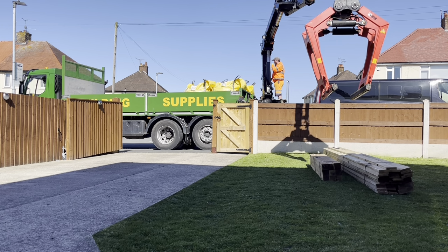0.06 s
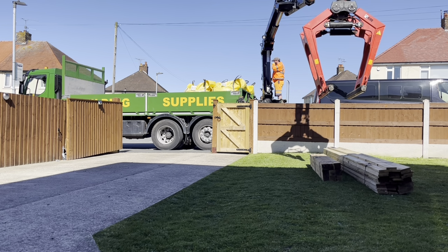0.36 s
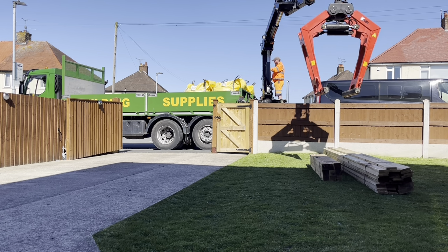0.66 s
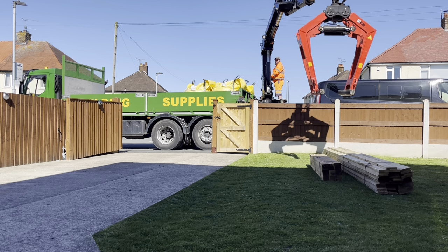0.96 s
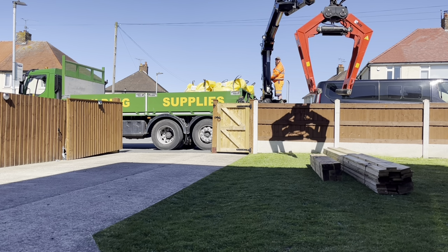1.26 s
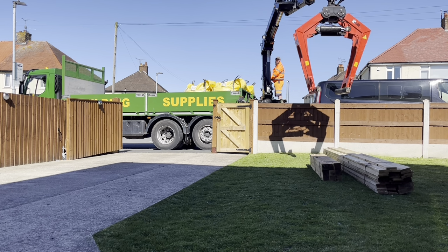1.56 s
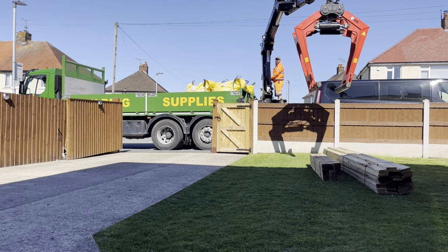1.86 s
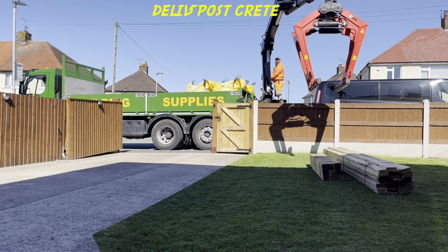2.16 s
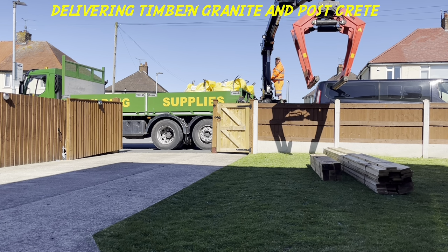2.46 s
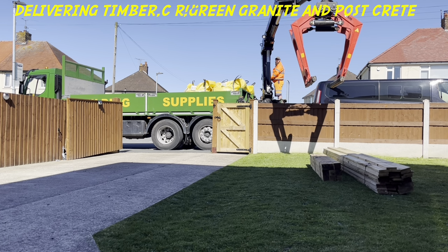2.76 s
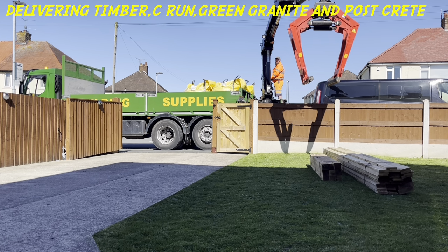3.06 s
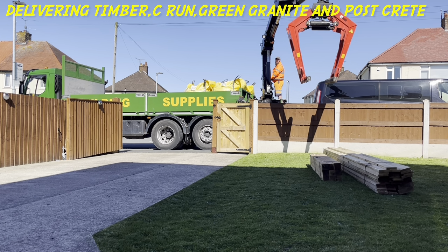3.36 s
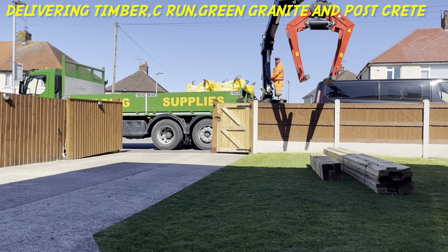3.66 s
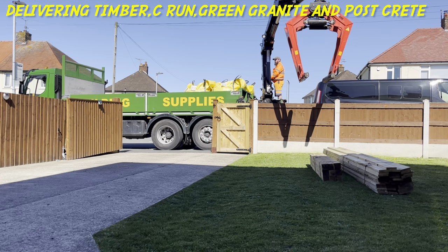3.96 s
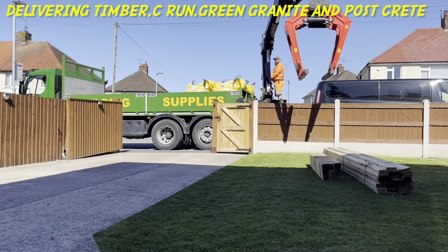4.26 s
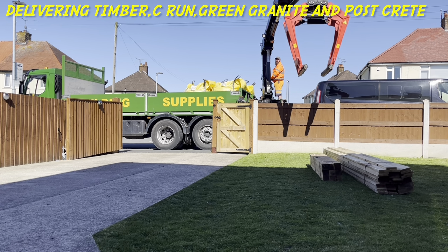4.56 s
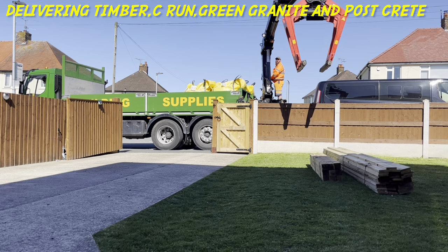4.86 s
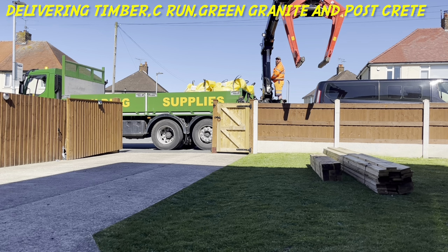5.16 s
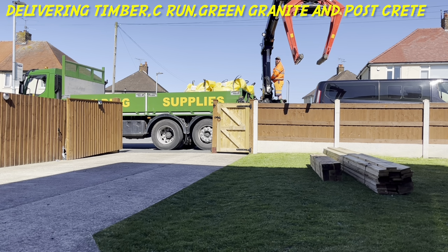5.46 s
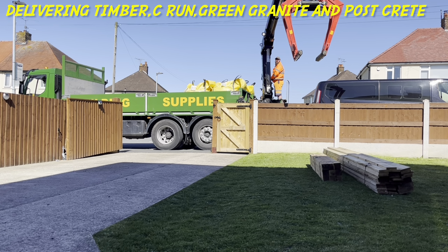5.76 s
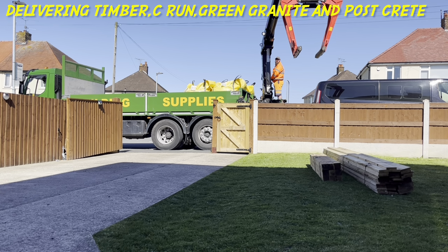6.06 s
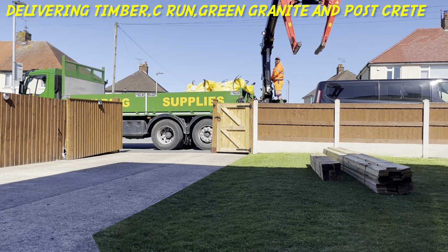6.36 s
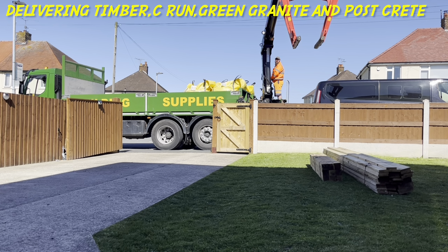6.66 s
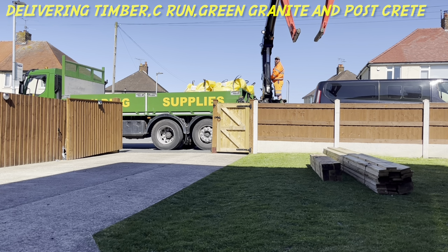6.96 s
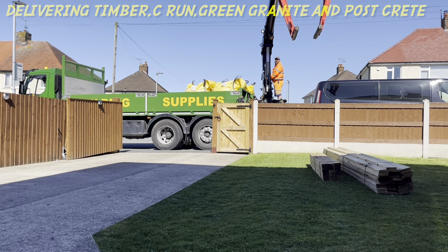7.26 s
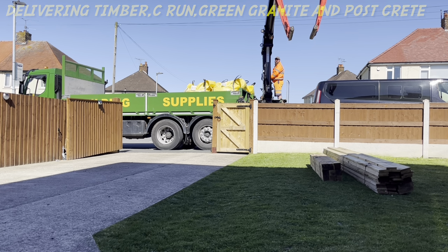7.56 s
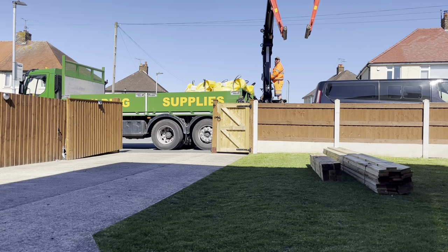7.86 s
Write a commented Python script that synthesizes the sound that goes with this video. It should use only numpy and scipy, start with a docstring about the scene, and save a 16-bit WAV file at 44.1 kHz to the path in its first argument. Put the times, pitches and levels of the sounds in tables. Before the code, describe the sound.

A diesel lorry idles throughout with a low, pulsing drone and a light rattle, while the pump of its loader crane hums and whines. About halfway, the steel grab gives a sharp clank, hydraulic hiss swells and the engine eases a little. A lighter knock follows a couple of seconds later, then a few faint clinks. It is heard outdoors in a street, with the lorry slightly to the left.

```python
"""A diesel lorry drones under load beyond a garden fence, driving the pump of its loader crane.
The engine pulses and rattles under thin gear whines; the pump's pressure ripple hums and whines,
and oil hisses through the valves with each lever stroke. The engine eases once the steel grab is open,
and the grab knocks twice as it is lifted clear. Fences and house fronts scatter the sound."""
import sys
import numpy as np
from scipy import signal
from scipy.fft import rfft, irfft, next_fast_len
from scipy.io import wavfile
from scipy.ndimage import uniform_filter1d, map_coordinates

SR = 44100
rng = np.random.default_rng(int(sys.argv[2]) if len(sys.argv) > 2 else 0)


def unload_audio(sound):
    """Save the sound as a 16-bit wav file, at the path given as the first command line argument."""
    columns = np.transpose(np.atleast_2d(sound))
    # keep every value between -1 and 1, then stretch to whole-number steps
    steps = np.round(np.clip(columns, -1, 1) * 32767)
    wavfile.write(sys.argv[1], SR, steps.astype(np.int16))


N = 353241
TIME = np.arange(N) / SR
RING_SAMPLES = 3 * SR // 4
IDLE_PISTON_HZ, PISTONS_PER_PULSE, PISTONS_PER_TURN = 86.19, 2.4, 6


def engine(piston_hz, above_idle_hz, work):
    """The diesel, geared to the pump; work runs from 1 (labouring) to 0 (relieved)."""
    pulse_hz = piston_hz / PISTONS_PER_PULSE   # about 36 Hz, two and a half beats per crank turn
    pulses = np.cumsum(pulse_hz) / SR
    body = drone(pulse_hz, above_idle_hz, work) + roar(above_idle_hz, work)
    beat = chug(piston_hz / PISTONS_PER_TURN, work) + clatter(pulses, work) + diesel_knock(pulses)
    return body + beat + fan(pulse_hz) + gears(pulse_hz, work)


# The engine's tones. Each row: multiple of the pulse rate, level in dB relative to the drone.
ENGINE_ORDERS = [(1, -13), (1.5, -29), (5, -14), (6, -15), (7, -8), (8, 1), (8.5, -11), (10, -15),
                 (14.5, -14.5), (23, -18), (38.5, -34), (46.5, -27), (52.5, -25.5), (60, -30.5), (81, -29),
                 (126.5, -32.5)]
def drone(pulse_hz, above_idle_hz, work):
    """A low drone and thin, high gear whines, louder under load and when the engine is dragged down."""
    drone_db = -43.5 + 10 * work - 1.6 * above_idle_hz
    return from_db(drone_db) * tones(pulse_hz, ENGINE_ORDERS, waver_db=1.5, wobble_rad=0.21)


# The colour of the roar. Each row: frequency in Hz, relative level in dB.
ROAR_SPECTRUM = [(60, -9), (85, 2.5), (105, 4), (125, -47), (150, 2), (205, 1), (235, 1.5), (280, 7.5),
                 (340, 5), (400, -5.5), (490, -2.5), (550, -1), (700, -8), (1100, -50)]
def roar(above_idle_hz, work):
    """The engine's dull bed of noise, fuller under load."""
    return from_db(-38.5 + 3 * work + 0.1 * above_idle_hz) * coloured(ROAR_SPECTRUM)


# The contour of the crankshaft's overtones. Each row: frequency in Hz, relative level in dB.
CHUG_SPECTRUM = [(70, -26), (100, -8), (128, -36), (158, 2.5), (172, -4), (186, -4.5), (208, 3.5),
                 (235, -6.5), (258, -3), (287, -13), (305, 0), (350, 0.5), (385, -14), (430, -17),
                 (490, -12), (610, -9.5), (720, -14), (830, -14.5), (1300, -18), (2200, -25.5), (5000, -80)]
def chug(crank_hz, work):
    """The part of the roar that repeats with every turn of the crankshaft."""
    size = 2 ** 15
    hz = np.arange(size // 2 + 1) * crank_hz.mean()
    phase = rng.uniform(0, 2 * np.pi, len(hz)) + rng.normal(0, 0.42, (2, len(hz)))
    one_turn = irfft(pan(hz) * from_db(at_hz(CHUG_SPECTRUM, hz)[0]) * np.exp(1j * phase))
    turns = np.cumsum(crank_hz) / SR
    return from_db(-47 + 5 * work) * unit_rms(one_turn[:, (turns * size).astype(int) % size])


# The colour of the clatter. Each row: frequency in Hz, relative level in dB.
CLATTER_SPECTRUM = [(300, -1.5), (600, 4), (1000, 4), (1300, 5.5), (1550, 3), (1800, -2), (2500, -4),
                    (3100, -6), (3900, -10), (4550, -9.5), (5300, -14.5), (6100, -20), (7400, -23),
                    (9500, -37.5), (14000, -27)]
def clatter(pulses, work):
    """Bright noise that flares slightly on each pulse, in a loop of six unequal accents."""
    accent_db = 0.5 * unit_rms(rng.standard_normal(6))[pulses.astype(int) % 6]
    flare = unit_rms(from_db(accent_db) * (1 + 0.024 * np.exp(-(pulses % 1) / 0.21)))
    return from_db(-41.5 + 2 * work + 0.27 * drift(25)) * flare * coloured(CLATTER_SPECTRUM)


# The engine block's ring. Each row: pitch in Hz, relative level in dB, t60 in seconds.
BLOCK_MODES = [(1357, -57, 0.056), (1520, -70, 0.062), (1608, -61.5, 0.068), (1749, -59.5, 0.13),
               (2152, -71, 0.052), (2325, -62.5, 0.19), (2535, -62, 0.14), (2820, -75, .05),
               (2990, -73, 0.16), (3294, -64, 0.069), (3440, -65, 0.24), (4080, -80, 0.033),
               (4530, -66, 0.068), (5340, -78, 0.023)]
def diesel_knock(pulses, jitter_s=0.0007, top_hz=5130):
    """Each pulse strikes the block's modes with strengths of its own; little radiates above top_hz."""
    hits = np.flatnonzero(np.diff(pulses.astype(int)))
    hits = np.clip(hits + jitter_s * SR * rng.standard_normal(len(hits)), 0, N - 1).astype(int)
    out = 0
    for hz, db, t60 in BLOCK_MODES:
        alike, lead = at_hz(STEREO_IMAGE, hz)
        mid, side = rng.standard_normal((len(hits), 2)).T
        clicks = np.full((2, N), 1e-18)
        clicks[:, hits] = left_right(mid, side, alike * np.cos(lead))
        radius, angle = from_db(-60 / (t60 * SR)), 2 * np.pi * hz / SR
        ring = signal.lfilter([1, 0, -1], [1, -2 * radius * np.cos(angle), radius ** 2], clicks)
        out = out + from_db(db) * pan(hz) * unit_rms(ring)
    return signal.sosfilt(signal.butter(4, top_hz, fs=SR, output="sos"), out)


def hydraulics(piston_hz, above_idle_hz, work):
    """The pump sings while the valves hiss with the oil they let through."""
    flows = {valve: oil_flow(valve) for valve in VALVE_RESONANCES}
    oil_db = 10 * np.log10(sum(flow ** 2 for flow in flows.values()))
    hiss = sum(flow * valve_hiss(valve) for valve, flow in flows.items())
    return pump(piston_hz, above_idle_hz, work, oil_db) + throb(piston_hz) + hiss


# The pump's four voices. Each row: multiple of the piston rate, level in dB within that voice.
HUM_ORDERS = [(2, 0.5), (4, -16), (5, -14)]
WHINE_ORDERS = [(5, -0.5), (7, -48), (13, -17), (31, -41)]
SHRILL_ORDERS = [(11, -53.5), (32, -73)]
STEADY_ORDERS = [(3, -40.5), (4, -51), (6, -54), (8, -53.5), (10, -73), (11, -52.5), (12, -61.5),
                 (13, -55.5), (16, -62)]
def pump(piston_hz, above_idle_hz, work, oil_db):
    """Pressure ripple hums under load, whines when oil runs freely and turns shrill at full flow."""
    hum_db = -46.5 + 8.5 * work - 8.5 * above_idle_hz
    oil_swing_db = (1 - work) * (oil_db - oil_db.mean())   # counts once the grab is open
    whine_db = -48.8 + 7 * above_idle_hz + 0.2 * oil_swing_db
    full_flow = np.clip(above_idle_hz / 0.37, 0, 1)
    hum = from_db(hum_db) * tones(piston_hz, HUM_ORDERS, waver_db=-2, wobble_rad=0.29)
    whine = from_db(whine_db) * tones(piston_hz, WHINE_ORDERS, waver_db=2.43, wobble_rad=0.56)
    shrill = full_flow ** 2 * tones(piston_hz, SHRILL_ORDERS, waver_db=1.5, wobble_rad=0.3)
    return hum + whine + shrill + tones(piston_hz, STEADY_ORDERS, waver_db=2, wobble_rad=0.52)


# Surges of oil pressure. Each row: middle in seconds, half length in seconds, level in dB.
PRESSURE_SURGES = [(1.8, 0.085, -38), (4.2, 0.14, -37), (5.05, 0.27, -38.5), (6.3, 0.17, -42.5),
                   (7.55, 0.12, -39)]
def throb(piston_hz, calm_db=-52):
    """Pressure surges make the pump's fundamental throb through the chassis."""
    gain = np.hypot(from_db(calm_db), swells(PRESSURE_SURGES))
    return gain * tones(piston_hz, [(1, 0)], waver_db=1.7, wobble_rad=0.18)


# The lever moves. Each row: start and end in seconds, valve, opening level in dB, ramp in dB per second.
LEVER_STROKES = [(0, 2, "grab", -56.5, 0.5), (1.92, 2.69, "grab", -51.5, 1), (2.64, 4.3, "grab", -54.5, -1),
                 (3.82, 5.06, "lift", -41.8, -9.5), (5.88, 7.7, "slew", -57.5, 3),
                 (6.58, 7.23, "slew", -57, 17), (7.28, 8.1, "slew", -51.5, -1)]
def oil_flow(valve, open_s=0.065, shut_s=0.025, leak_db=-71):
    """Gain of a valve's hiss: each stroke opens, eases and shuts it; a little oil always leaks by."""
    power = from_db(leak_db) ** 2
    for start, end, worked, db, db_per_s in LEVER_STROKES:
        if worked == valve:
            opening = np.clip((TIME - start) / open_s, 0, 1) * np.clip(1 - (TIME - end) / shut_s, 0, 1)
            held_s = np.clip(TIME - start, 0, end - start)
            power = power + (opening * from_db(db + db_per_s * held_s)) ** 2
    return np.sqrt(power)


# The colour of the hiss. Each row: frequency in Hz, relative level in dB.
HISS_SPECTRUM = [(2500, 23.5), (4500, 20.5), (6000, 17), (7400, 15), (8400, -4), (10000, 18.5),
                 (13500, 17.5), (14600, 6), (15300, 0)]
# The whistles in each valve's passages. Each row: centre in Hz, width in Hz, boost in dB.
VALVE_RESONANCES = { "grab": [(6700, 80, 5), (9400, 83, 13), (10600, 130, 5), (13500, 150, 2)],
                    "lift": [(4274, 19, 8), (5750, 50, 7), (6350, 40, 3), (6350, 32, 8), (8700, 70, 17),
                    (9400, 120, 14.5), (10796, 130, 0), (12410, 70, 4), (13450, 131, 6)],
                    "slew": [(6370, 30, 13), (7150, 60, 9), (8598, 50, -2), (9150, 50, 17), (9550, 45, 10),
                    (9700, 45, 1), (10950, 60, -4), (12000, 60, 5), (13200, 90, 3)]}
def valve_hiss(valve):
    """Oil through one valve: broad and bright, coloured by its passages."""
    def shape(hz):
        boost_db = sum(db / (1 + ((hz - f) / width) ** 2) for f, width, db in VALVE_RESONANCES[valve])
        return from_db(at_hz(HISS_SPECTRUM, hz)[0] + boost_db)
    return stereo_noise(shape)


# Blows on the grab. Each row: start in seconds, struck part, relative level in dB,
# contact brightness in Hz, relative ring level in dB, favoured pitch in Hz.
GRAB_BLOWS = [(4.063, "arms", -25, 4560, 3.5, 2520), (4.073, "arms", -19.5, 2500, 6, 2240),
              (4.086, "arms", -22, 140, -6, 120), (4.094, "arms", -28.5, 1500, 9.5, 790),
              (4.114, "arms", -27, 1500, 6.5, 349.6), (4.771, "arms", -36, 120, 16, 147.5),
              (6.305, "link", -29.5, 6500, 2.5, 4500), (6.31, "link", -29.5, 2000, 8.5, 266),
              (6.316, "link", -29, 3500, 6.5, 423), (6.385, "link", -38, 600, 8, 420),
              (7.058, "link", -43, 5000, -4, 3615), (7.142, "link", -43.5, 700, 10, 394)]
def grab_knocks():
    """The heavy arms and linkage strike their stops; a softer contact gives a duller knock."""
    out = np.zeros((2, N))
    for start, part, db, bright_hz, ring_db, favoured_hz in GRAB_BLOWS:
        blow = grab_wash() + from_db(ring_db - 15.5) * grab_ring(part, favoured_hz)
        contact = signal.butter(1, bright_hz, fs=SR)
        add(out, start, from_db(db - 2) * signal.lfilter(*contact, blow))
    return out


# The steel parts' ring, plus a thin pump tone lingering near 2770 Hz.
# Each row: pitch in Hz, relative level in dB, t60 in seconds.
GRAB_TONES = { "arms": [(120, -8, 0.3), (146.4, 0, 0.35), (222, 0.5, 1.1), (296.3, 6, 0.34),
              (398.6, 4, 0.41), (515, 1, 0.28), (684, -0.5, 0.49), (778, 1, 0.29), (1231, 1, 0.27),
              (1620, -2, 0.18), (1847, 3, 0.16), (2070, -6.5, 0.25), (2240, -9, 0.14), (2490, -4, 0.16),
              (2680, -9.5, 0.15), (2770, -19.5, 1.3), (3500, -4, 0.22), (4230, -3, 0.19), (4640, 7, 0.18),
              (5300, 2, 0.22), (6150, -2, 0.17)], "link": [(279.8, -1, 0.5), (380.4, 4.5, 0.48),
              (450, -1.5, 0.59), (490, -3, 0.45), (730.5, -4, 0.34), (947, 3, 0.32), (1048.5, 2, 0.36),
              (1499, 6, 0.25), (2140, 0, .24), (2690, 6, 0.24), (3790, -3, 0.17), (3900, -4, 0.49),
              (4340, -4, 0.31), (4880, -3, 0.24), (5290, 3, 0.18), (6380, -11, 0.38), (6760, -5, 0.12),
              (8100, -8, 0.091)]}
def grab_ring(part, favoured_hz, favour_db=12.5, reach_octaves=0.24):
    """The tones that linger after one blow; where the part is struck decides which ring loudest."""
    t, ring = TIME[:RING_SAMPLES], 0
    for hz, db, t60 in GRAB_TONES[part]:
        nearness = np.exp(-(np.log2(hz / favoured_hz) / reach_octaves) ** 2)
        phase = 2 * np.pi * (hz * t + rng.random()) + rng.normal(0, 0.67, (2, 1))
        ring = ring + pan(hz) * from_db(db + favour_db * nearness - 60 * t / t60) * np.sin(phase)
    return ring * (1 - np.exp(-t / 0.0015))


# The tail of a blow. Each row: frequency in Hz, relative level in dB, t60 in seconds.
GRAB_TAIL = [(100, -1.5, 0.36), (197, 6.5, 0.62), (453, 9, 0.31), (920, 0.5, 0.56), (1380, 1, 0.24),
             (2170, -3.5, 0.3), (3140, -8, 0.27), (4840, -5.5, 0.45), (7000, -17, 0.3), (8900, -46, .25),
             (15000, -12, .15)]
def grab_wash(swell_cycles=4.2):
    """Dense ringing, scattered by the street: it dies band by band, and the lows swell last."""
    t, wash = TIME[:RING_SAMPLES], 0
    edges_hz = 80 * 2 ** np.arange(0, 8, .5)
    white = [stereo_noise(np.ones_like, RING_SAMPLES) for _ in range(2)]
    for k, (low, high) in enumerate(zip(edges_hz, edges_hz[1:])):
        hz = np.sqrt(low * high)
        db, t60 = at_hz(GRAB_TAIL, hz)
        band = signal.sosfilt(signal.butter(2, [low, high], "band", fs=SR, output="sos"), white[k % 2])
        wash = wash + band * from_db(db - 60 * t / t60) * (1 - np.exp(-t * hz / swell_cycles))
    return wash / wash[:, :SR // 20].std()


# Steel clinks. Each row: start in seconds, level in dB, centre in Hz, sharpness as Q, t60 in seconds.
LINKAGE_CLINKS = [(4.062, -24.5, 5800, 1.8, 0.087), (4.062, -30, 11000, 0.95, 0.03),
                  (4.074, -22.5, 2310, 3.1, 0.078), (6.304, -29.5, 6100, 3, 0.039),
                  (6.304, -38, 11000, 0.95, 0.022), (6.322, -36.5, 4400, 2.7, .2),
                  (6.305, -45, 12500, 1.5, 0.32), (6.568, -51, 4500, 2, .1), (7.012, -42, 7250, 9, 0.17),
                  (7.02, -44.5, 9630, 4.4, 0.33), (7.02, -46, 12500, 1.5, 0.066),
                  (7.06, -41, 3500, 2.2, 0.22), (7.49, -43, 3197, 11, 0.14),
                  (7.684, -33.5, 1582, 4.9, 0.17)]
def linkage_clinks(attack_s=0.0006):
    """Slack in the linkage snaps taut in short, bright bursts."""
    out, t = np.zeros((2, N)), TIME[:RING_SAMPLES]
    for start, db, hz, sharpness, t60 in LINKAGE_CLINKS:
        steel = signal.iirpeak(hz, sharpness, fs=SR)
        white = stereo_noise(np.ones_like, RING_SAMPLES)
        burst = unit_rms(signal.lfilter(*steel, signal.lfilter(*steel, white)))
        add(out, start, burst * from_db(db - 60 * t / t60) * (1 - np.exp(-t / attack_s)))
    return out


# Panels singing along. Each row: centre in Hz, width in Hz, level in dB.
PANEL_RESONANCES = [(142, 8.6, -49.5), (203.6, 10, -44.5), (317, 9.8, -49), (531, 18, -47.5),
                    (616.4, 18, -54.5), (696, 21, -51), (794, 30, -51.5), (898, 2.5, -59),
                    (936, 5.4, -58.5), (1213, 34, -55.5), (2686, 12, -60)]
def panels():
    """Narrow resonances of the lorry, shaken at random."""
    def shape(hz):
        return np.sqrt(sum(from_db(db) ** 2 / width / (1 + ((hz - f) / width) ** 2) ** 2
                           for f, width, db in PANEL_RESONANCES))
    return np.linalg.norm(from_db([db for _, _, db in PANEL_RESONANCES])) * stereo_noise(shape)


# The colour of the rumble. Each row: frequency in Hz, relative level in dB.
RUMBLE_SPECTRUM = [(20, -19), (30, 6), (40, 6), (52, 20), (65, 1), (85, 3), (120, -27), (250, -55)]
# Lurches, then shudders. Each row: middle in seconds, half length in seconds, relative level in dB.
CHASSIS_LURCHES = [(1.65, 0.2, -50), (4.05, 0.51, -37.5), (4.9, 0.35, -48), (5.88, 0.22, -43.5),
                   (6.62, 0.15, -41), (7.05, 0.12, -40), (7.56, .17, -40)]
BOOM_SHUDDERS = [(.22, 0.22, -34), (.6, 0.21, -35.5), (1.08, 0.25, -30.5)]
def rumble(calm_db=-52):
    """The boom shudders as the grab opens, and the chassis rumbles up as the boom's weight shifts."""
    shudder_hz = 47 - 3.16 * TIME   # slows as the arms spread
    shudder = swells(BOOM_SHUDDERS) * tones(shudder_hz, [(1, -1.3)], waver_db=1.5, wobble_rad=0.2)
    return shudder + np.hypot(from_db(calm_db), swells(CHASSIS_LURCHES)) * coloured(RUMBLE_SPECTRUM)


# The fan's tones. Each row: multiple of the blade rate, level in dB.
FAN_ORDERS = [(1, -49), (2, -48), (3, -48.5), (5, -56.5)]
def fan(pulse_hz, blades_per_pulse=1.462):
    """The cooling fan's passing blades hum in step with the engine."""
    return tones(pulse_hz * blades_per_pulse, FAN_ORDERS, waver_db=1.5, wobble_rad=0.18)


# The timing gears' tone. Each row: multiple of the pulse rate, level in dB.
GEAR_ORDERS = [(34.5, -52)]
# The fader ride on their high whistle. Each row: time in seconds, level in dB.
WHISTLE_LEVELS = [(0, -57), (.7, -60.5), (1.2, -56.5), (1.6, -62), (2.2, -57), (2.55, -61), (2.82, -56),
                  (3.3, -61), (3.9, -60.5), (4.8, -61), (5.7, -59.5), (6.2, -70), (8, -81)]
def gears(pulse_hz, work, whistle_order=95, backlash_rad=0.78, backlash_db=2.4):
    """Meshing teeth sing; backlash chops their whistle while the engine labours."""
    timing = tones(pulse_hz, GEAR_ORDERS, waver_db=3, wobble_rad=0.58)
    flutter_rad = uniform_filter1d(backlash_rad * work * drift(76), size=41)
    whistle_hz = pulse_hz * whistle_order + np.gradient(flutter_rad) * SR / (2 * np.pi)
    whistle_db = in_time(WHISTLE_LEVELS) + backlash_db * work * drift(22.05)
    return timing + from_db(whistle_db) * tones(whistle_hz, [(1, 0)], waver_db=2.5, wobble_rad=0.78)


# Stereo image at the microphone pair: left-right likeness and a slight delay between channels.
# Each row: frequency in Hz, likeness from 0 to 1, left's lead in radians.
STEREO_IMAGE = [(60, .99, 0), (200, .88, .3), (300, .78, -.3), (450, .4, -.3), (650, .4, -3),
                (1550, .45, -3.2), (1750, .8, -5.9), (2500, .7, -5.6), (3200, .42, -5.2), (4800, .2, -5.8),
                (6500, .45, -7.5), (8300, .99, -9.4), (11700, .88, -12.6), (15000, .75, -15.7)]
def stereo_noise(shape, count=N):
    """Noise of unit rms, coloured by shape(Hz), its channels partly alike and slightly apart in time."""
    size = next_fast_len(count, True)
    hz = np.arange(size // 2 + 1) * SR / size
    mid, side = rfft(rng.standard_normal((2, size)))
    alike, lead = at_hz(STEREO_IMAGE, hz)
    spectrum = left_right(mid, side, alike) * np.exp(1j * lead * [[.5], [-.5]])
    return unit_rms(irfft(spectrum * pan(hz) * shape(hz), size)[:, :count])


def tones(rate_hz, orders, waver_db, wobble_rad):
    """Overtones of a turning part; each wavers in level and phase and has its own stereo offset."""
    angle, out = 2 * np.pi * np.cumsum(rate_hz) / SR, 0
    for multiple, db in orders:
        hz = multiple * rate_hz.mean()
        alike, lead = at_hz(STEREO_IMAGE, hz)
        apart = np.arccos(alike * np.cos(lead)) * np.sign(np.sin(lead))
        phase = multiple * angle + rng.uniform(0, 2 * np.pi) + wobble_rad * drift(12)
        gain = from_db(db + waver_db * drift(7)) * pan(hz)
        out = out + gain * np.sin(phase + apart * np.array([[-.5], [.5]]))
    return np.sqrt(2) * out


# The balance. Each row: frequency in Hz, left minus right in dB.
BALANCE = [(60, 0.5), (130, -1.5), (260, 2.5), (480, 3), (950, 2), (1500, 1.5), (2200, 0.5), (3800, 6.5),
           (5500, 5), (7500, 9), (15000, -3.5)]
def pan(hz):
    """Left and right gain: the lorry stands a little to the left."""
    return from_db(np.array([[.5], [-.5]]) * at_hz(BALANCE, hz)[0])


def left_right(mid, side, alike):
    """Two channels whose correlation is alike."""
    return np.sqrt(1 + alike) * mid + np.sqrt(1 - alike) * side * [[1], [-1]]


def coloured(spectrum):
    """Stereo noise with a given spectrum."""
    return stereo_noise(lambda hz: from_db(at_hz(spectrum, hz)[0]))


def swells(rows):
    """Gain of bell-shaped swells, added in power."""
    return np.sqrt(sum(from_db(db) ** 2 * np.exp(-((TIME - s) / half_s) ** 2) for s, half_s, db in rows))


def drift(rate):
    """A smooth random wander of unit rms, changing about rate times a second."""
    knots = rng.standard_normal(2000)
    return unit_rms(map_coordinates(knots, [TIME[::20] * rate], order=3, mode="wrap")).repeat(20)[:N]


def at_hz(points, hz):
    """Each column of a spectrum at the given frequencies."""
    f, *columns = np.transpose(points)
    return [np.interp(np.log(hz + 1e-9), np.log(f), c) for c in columns]


def in_time(rows):
    """A curve's value at every sample."""
    return np.interp(TIME, *np.transpose(rows))


def add(out, start_s, sound):
    """Mix a sound in from start_s."""
    start = round(start_s * SR)
    out[:, start:start + sound.shape[1]] += sound[:, :N - start]


def from_db(db):
    """Decibels to gain."""
    return 10 ** (np.asarray(db) / 20)


def unit_rms(x):
    """Scale to unit rms."""
    return x / np.sqrt(np.mean(x ** 2) + 1e-20)


# The pump's speed, sagging as the crane takes up load. Each row: time in seconds, piston rate in Hz.
PUMP_SPEED = [(0, 85.4), (1, 86.4), (1.9, 86.47), (2.55, 86.04), (3.1, 86.42), (3.9, 86.27), (4.3, 87.04),
              (5.0, 87.36), (5.3, 86.73), (5.8, 86.24), (6.45, 86.2), (6.7, 84.88), (7.1, 84.77),
              (7.5, 87.38), (7.83, 87.37), (7.96, 86.2)]
def scene():
    """Engine, fan and pump sag together; the engine works harder until the grab is fully open."""
    piston_hz = in_time(PUMP_SPEED)
    above_idle_hz = piston_hz - IDLE_PISTON_HZ
    grab_open_s, unload_s = 4.13, 0.28
    work = np.clip((grab_open_s - TIME) / unload_s, 0, 1)
    lorry = engine(piston_hz, above_idle_hz, work) + panels() + rumble()
    return lorry + hydraulics(piston_hz, above_idle_hz, work) + grab_knocks() + linkage_clinks()


def record(dry):
    """The deepest bass is rolled off and the top is cut steeply."""
    low_cut_hz, high_cut_hz = 21, 15400
    dry = signal.sosfilt(signal.butter(4, low_cut_hz, "high", fs=SR, output="sos"), dry)
    return signal.sosfilt(signal.ellip(10, .1, 80, high_cut_hz, fs=SR, output="sos"), dry)


dry = scene()
out = record(dry)
unload_audio(out)
```